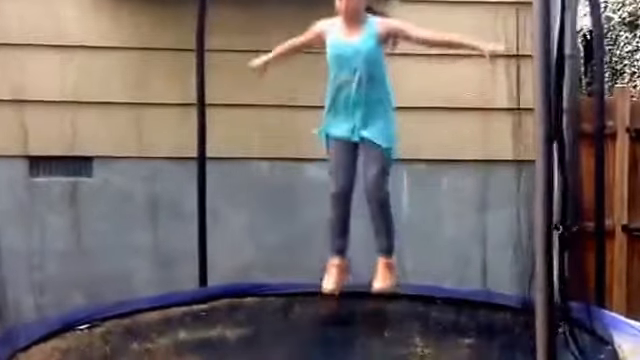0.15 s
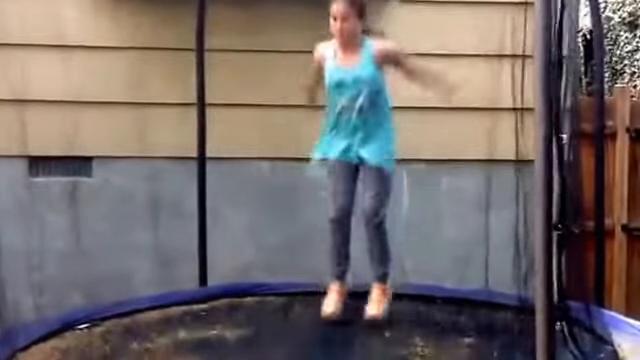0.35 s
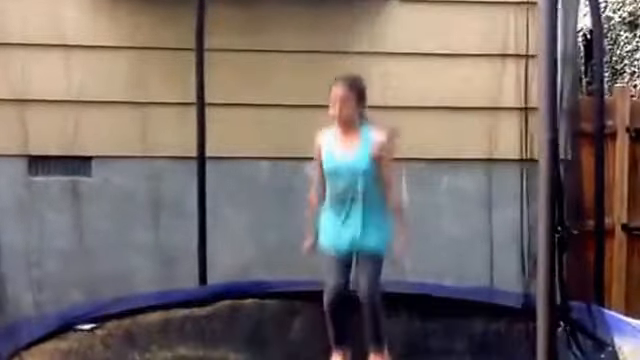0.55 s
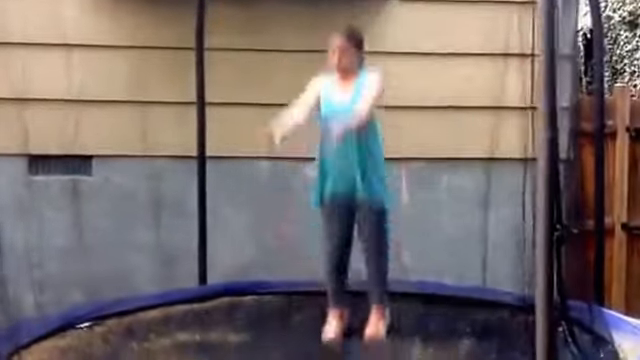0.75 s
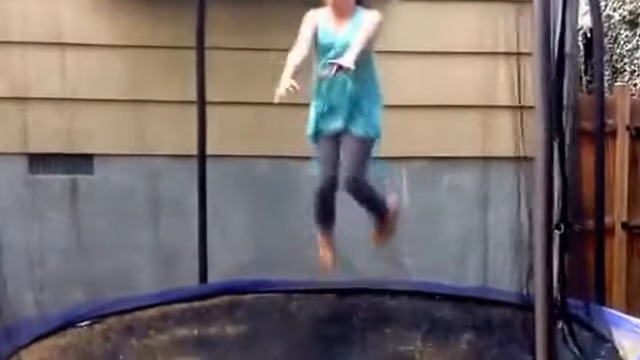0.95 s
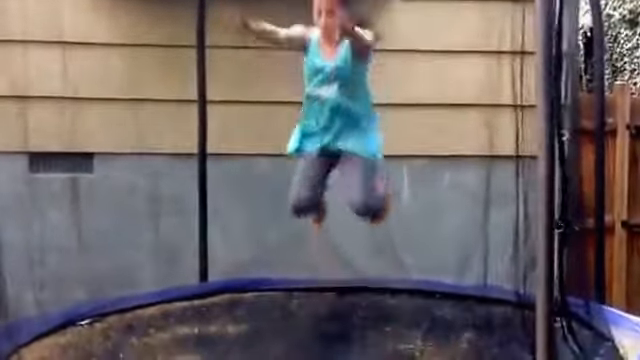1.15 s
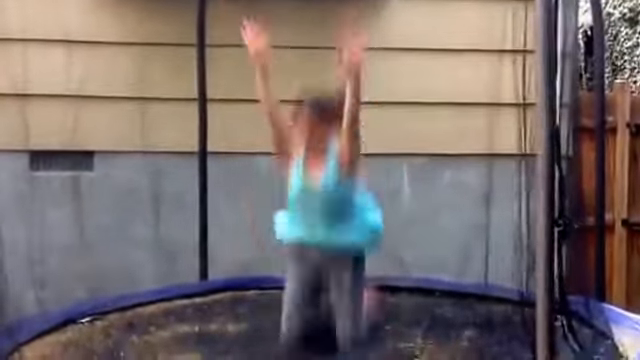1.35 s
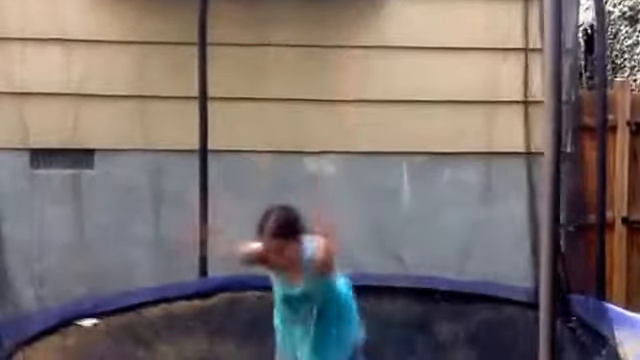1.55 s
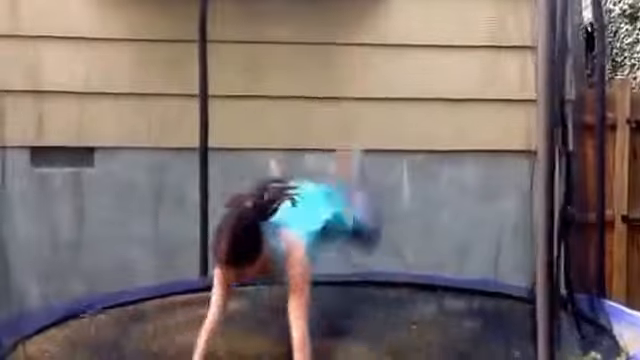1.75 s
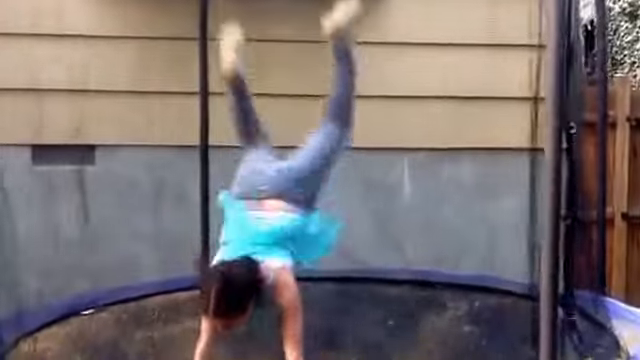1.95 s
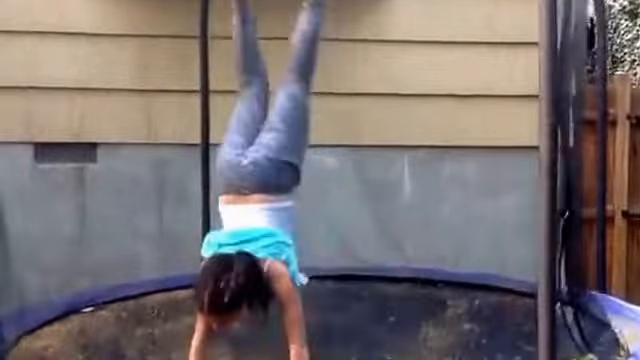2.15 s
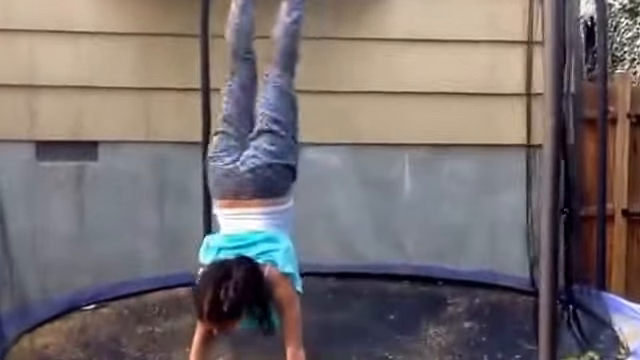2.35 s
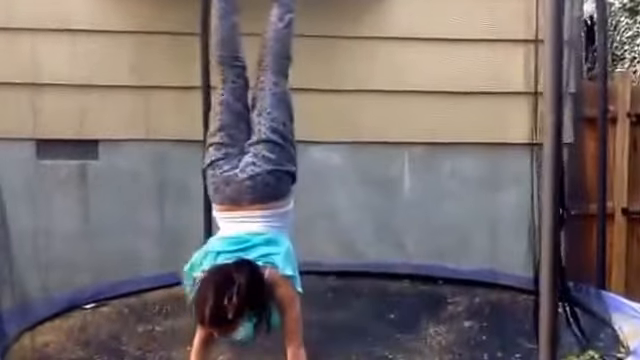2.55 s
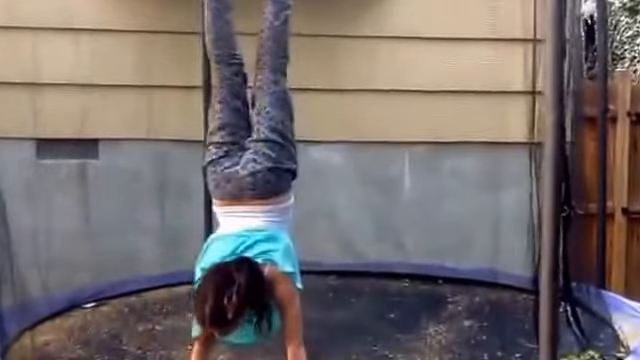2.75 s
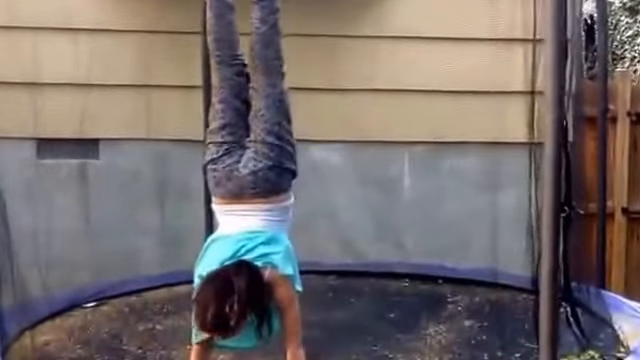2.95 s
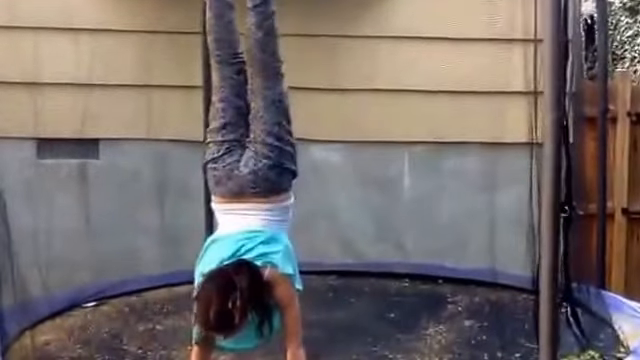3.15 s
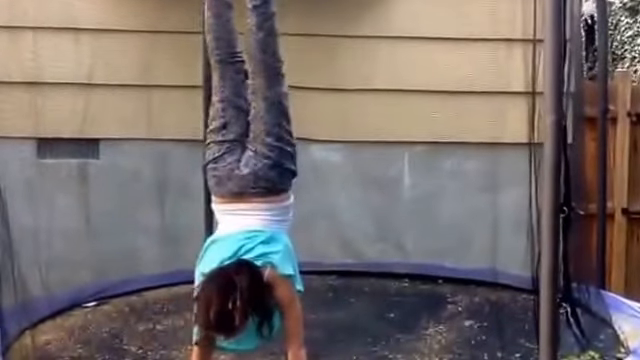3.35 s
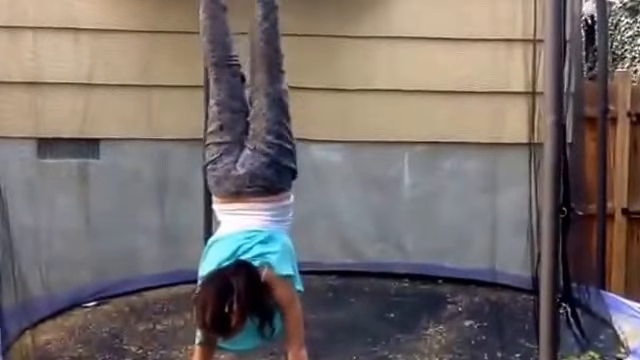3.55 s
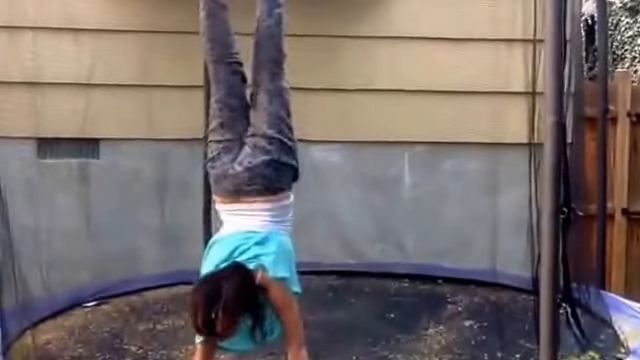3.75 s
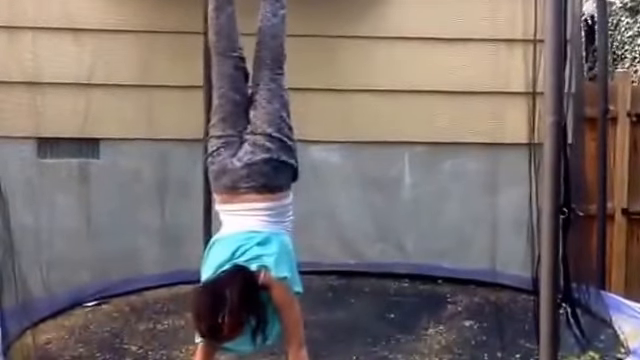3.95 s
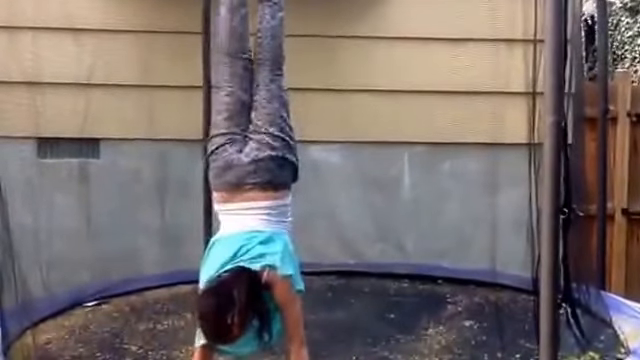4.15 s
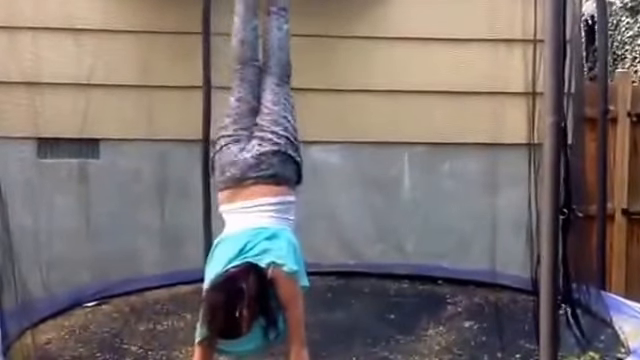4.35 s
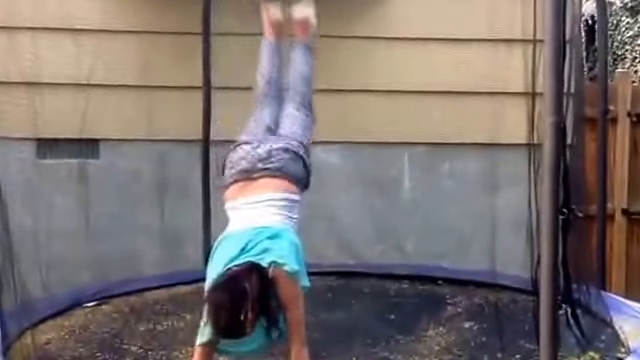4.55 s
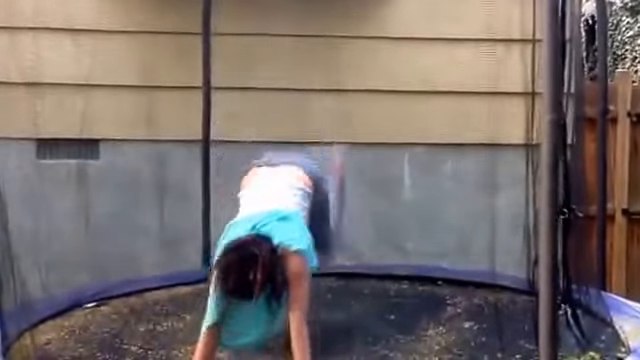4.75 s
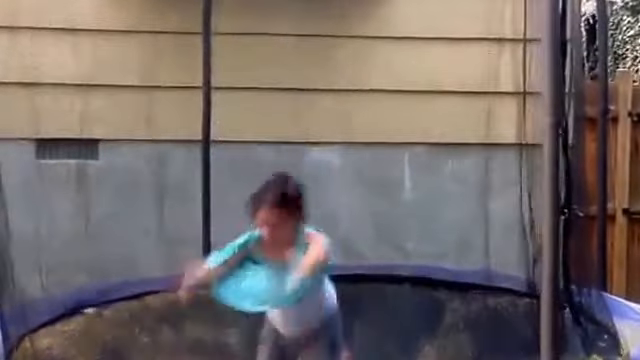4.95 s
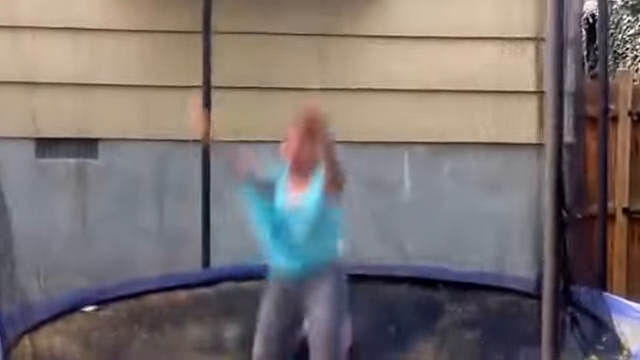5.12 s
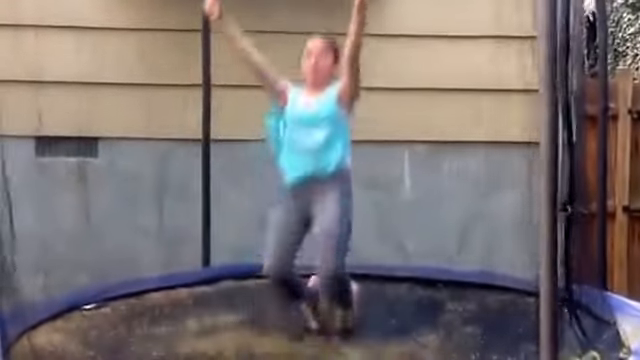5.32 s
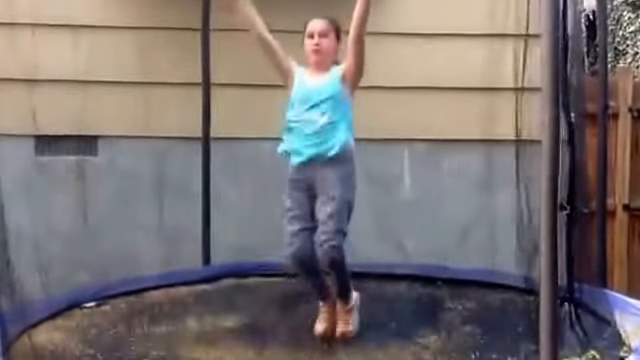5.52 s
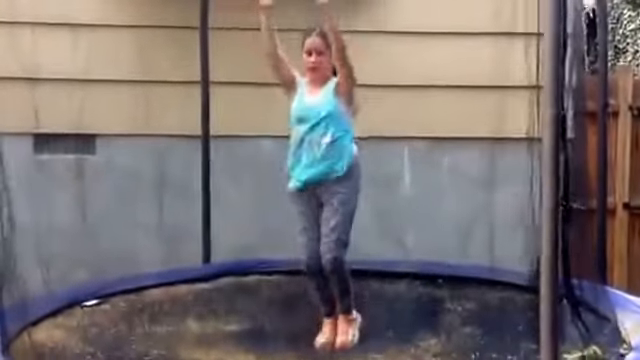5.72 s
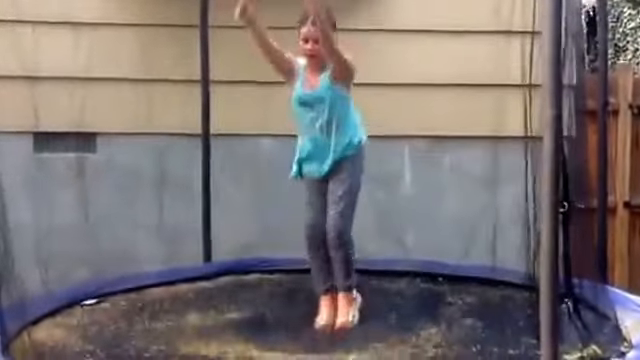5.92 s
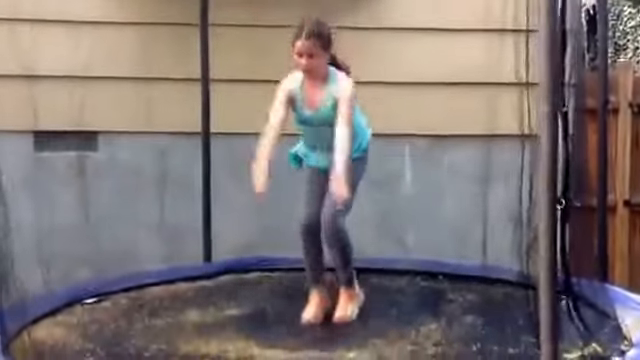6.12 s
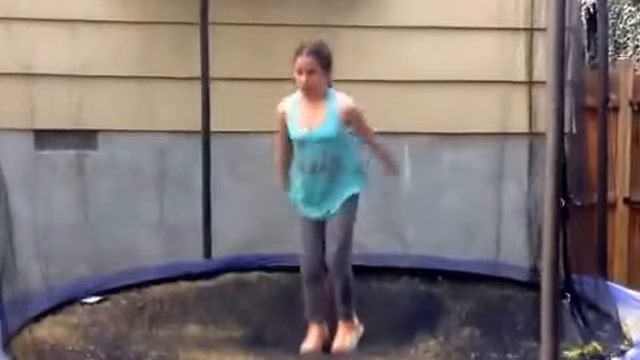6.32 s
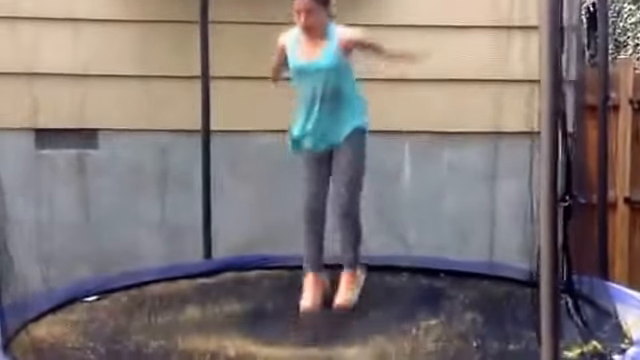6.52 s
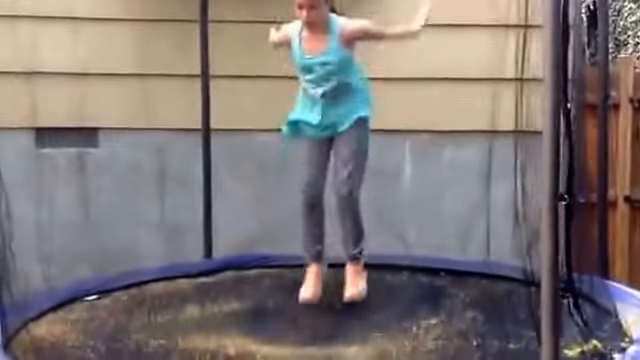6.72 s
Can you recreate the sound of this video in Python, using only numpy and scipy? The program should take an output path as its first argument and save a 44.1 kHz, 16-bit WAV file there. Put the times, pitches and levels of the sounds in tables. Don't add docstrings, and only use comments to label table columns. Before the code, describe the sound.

A small, thin-bassed microphone hears a backyard trampoline. Two light slaps lead to one bright, dominant smack with a low thud, metallic ping and rush of air. Brief spring squeaks fade into near stillness, where sliding whistles and hoarse, echoing chirps stand out. A quick squeaky chatter leads to a softer, duller body landing, then cloth brushes, one light slap and scattered ticks over distant traffic.

```python
import sys
import numpy as np
from scipy import signal
from scipy.fft import rfft, irfft, next_fast_len
from scipy.io import wavfile
from scipy.ndimage import map_coordinates

SR = 44100
rng = np.random.default_rng(int(sys.argv[2]) if len(sys.argv) > 2 else 0)


def wav_record(signal):
    frames = np.transpose(np.atleast_2d(signal))
    bounded = np.clip(frames, -1, 1)
    quanta = np.round(bounded * 32767).astype(np.int16)
    wavfile.write(sys.argv[1], SR, quanta)


def how_loud(loudness_db):
    steps = np.asarray(loudness_db, float) / 20
    return 10 ** steps


N = 298998

# start in seconds, level in dB, clap of cloth in dB, rise in seconds,
# time to die by 60 dB in seconds.
THUDS = [
    (.6, -54, 3, 0.0064, 0.12),
    (1.5, -34.5, -0.5, 0.014, 0.088),
    (1.783, -50, -17, 0.0083, 0.12),
    (4.985, -47.5, -2, 0.022, 0.19),
    (5.018, -35, 2.5, 0.0074, 0.058),
    (5.307, -66, 14, 0.0029, 0.033),
    (5.324, -62.5, 14, 0.0035, 0.12),
]
# start in seconds, peak in dB, pitch in Hz, time to die by 60 dB in seconds.
PUSHES = [
    (1.4141, -30.5, 251, 0.019),
    (1.4277, -31, 235, 0.022),
    (4.9221, -28, 226, 0.024),
]
# pitch in Hz, width in Hz, level in dB.
DRUM = [(160, 86, -4), (254, 69, 4), (408, 110, 2)]
CLOTH = [(1130, 460, 4), (1640, 800, 2), (2480, 890, -4)]

# start in seconds, peak in dB, dull part in dB, bright part in dB,
# time to die by 60 dB in seconds.
SLAPS = [(0.5256, -34.5, -14, 2.5, 0.022), (0.6179, -31, -2, 1, 0.073), (1.482, -23, -4, -5, 0.068),
         (1.494, -15.5, -12, 3.5, 0.058), (1.8096, -33, -11, -0.5, 0.071), (2.3235, -54, -3, 9.5, 0.18),
         (4.6897, -43, 5, 3, 0.11), (4.8308, -43.5, 9, -6, 0.089), (5.0015, -43, 6, 3, 0.08),
         (5.025, -36, 0, -4, 0.08), (5.6462, -50, 7, 10, 0.082), (6.0155, -35.5, -0.5, -1, 0.095)]
# pitch in Hz, width in Hz, level in dB.
FRAME = [(3080, 1400, 0.5), (5550, 1970, 0), (7480, 1730, 0), (8250, 550, 3.5), (10070, 2400, -4),
         (12800, 3700, -13.5)]
# start in seconds, peak in dB.
KNOCKS = [(.0113, -47), (.9944, -52), (1.4361, -52), (1.9305, -47), (2.156, -52), (2.2664, -47.5),
          (2.8263, -52), (2.88, -52), (5.75, -50.5), (6.0576, -51.5), (6.2998, -46.5)]
SNAPS = [(.0812, -54.5), (.4407, -53), (.474, -51), (.8868, -57), (1.4245, -48), (1.8438, -63),
         (2.9304, -54.5), (4.9225, -47), (5.5544, -54), (5.983, -54), (6.1497, -56), (6.7245, -52),
         (.3774, -63)]
TICKS = [
    (1.515, -30.5),
    (5.1574, -45),
    (6.0794, -48),
    (6.3847, -42),
    (6.4443, -46),
    (6.4658, -44),
    (6.4794, -42),
    (6.494, -53),
    (6.7494, -54),
]
# dull part in dB, bright part in dB,
# time to die by 60 dB in seconds.
KNOCK = (10.2, -1.5, .09)
SNAP = (6, 6.7, 0.037)
TICK = (-21, -1, 0.071)
HARD_DB = -40
BLOW = 5.6

# peak in seconds, rise in seconds, fall in seconds, level in dB,
# dull share in dB. Rise and fall each span 20 dB.
SWELLS = [(0.0, .1, .2, -59, -1.5), (.68, 0.37, 0.42, -55, 2), (1.47, 0.063, 0.45, -55.5, 3),
          (1.97, 0.38, 0.31, -54, -2.5), (2.3, 0.13, 0.62, -67.5, 5), (4.62, 0.37, 1, -77.5, 13),
          (4.94, .03, 0.22, -59.5, -14), (5.09, 0.2, 0.16, -54.5, -4), (5.3, 0.86, 0.19, -63, 9.5),
          (5.63, 0.49, 0.23, -62.5, -16), (5.82, 0.38, 0.68, -66.5, 8), (6.11, 0.18, 0.049, -66, 1),
          (6.38, 0.27, 0.28, -55, -5.5), (6.76, 0.41, 0.14, -71, 13)]
# start in seconds, rise in seconds, length in seconds,
# first level in dB, last level in dB.
GUSHES = [
    (1.495, .02, .175, -42, -47),
    (4.985, .018, .2, -44, -54),
]
# pitch in Hz, level in dB per Hz.
WEAVE = [(290, -13), (500, -8.5), (788, -1), (847, -1.5), (1280, -5), (1720, -1), (5010, -6), (8020, -4.5),
         (15000, -5.5)]
SWELL_ROUND, GUSH_DULL_DB = 1.66, -3.5

# start in seconds, length in seconds, slip rate in Hz, level in dB,
# number of strong overtones.
SQUEAKS = [
    (1.852, 0.024, 1100, -52, 1.2),
    (1.93, 0.022, 1115, -53, 3.6),
    (1.974, 0.016, 1152, -53, 2),
    (2.321, 0.07, 980, -62, 5.6),
    (2.72, .05, 499, -61, 3),
    (4.251, .03, 1650, -68, 1),
    (4.437, 0.14, 1160, -65, 2),
    (5.24, .03, 1290, -53, 2),
]
# length in seconds, slip rate in Hz, level in dB, number of strong overtones.
TRILL = (0.06, 1477, -55.5, 0.7)
TRILL_S, TRILL_GAP_S, TRILL_TIMES = 4.529, .0398, 5
SQUEAK_ARCH, TRILL_ARCH = .015, .13
SQUEAK_TILT_DB, SQUEAK_SAG_DB, SQUEAK_ROUGH = -1, 9, .45
# start in seconds, level in dB, pitch in Hz, second pitch in Hz,
# time to die by 60 dB in seconds.
PINGS = [
    (1.4822, -36, 3650, 5500, .04),
    (1.4948, -29, 7000, 4600, .02),
    (1.497, -24, 7800, 3900, .045),
    (.13, -64, 8570, 11300, 0.52),
    (0.936, -58.5, 8470, 11300, 0.54),
    (1.318, -68, 10900, 7040, 0.27),
    (2.25, -70, 7200, 6700, .15),
    (2.83, -72, 10900, 6700, .4),
    (4.45, -67, 7000, 7500, .5),
    (6.58, -61, 11300, 8450, 0.27),
]

# start in seconds, length in seconds, start pitch in Hz, held pitch in Hz, level in dB.
WHISTLES = [(.46, .1, 2440, 2295, -58), (2.22, .1, 3370, 3175, -67), (2.33, .15, 3010, 2735, -66),
            (3.0, .08, 2350, 2200, -69), (3.29, .15, 3440, 2865, -64), (3.375, .14, 2540, 2035, -65),
            (3.855, .25, 2400, 2840, -60), (3.97, .05, 3300, 3700, -73), (4.03, .07, 3750, 3450, -73),
            (4.2, .1, 3500, 3300, -74), (4.315, .05, 1930, 2110, -60), (4.57, .11, 2780, 2320, -58),
            (5.9, .075, 3070, 2845, -64), (6.49, .1, 2450, 2075, -64), (6.62, .11, 2820, 2675, -62)]
# start in seconds, length in seconds, pitch in Hz, level in dB.
NOTES = [(.195, .055, 2000, -62), (.4, .03, 2785, -69), (.43, .04, 2635, -64), (.885, .06, 2915, -64),
         (.905, .1, 2305, -58), (1.012, .055, 1995, -58), (2.76, .12, 2235, -67), (2.78, .06, 2075, -62),
         (2.89, .08, 2655, -67), (2.95, .06, 1995, -65), (6.06, .08, 3150, -66), (4.435, .04, 2315, -62),
         (4.44, .09, 2855, -60), (5.07, .1, 2845, -63), (6.07, .08, 2025, -66)]
SCOOP, FALL_S, RISE_S = 1.015, .015, .01
# start in seconds, level in dB.
CHIRPS = [
    (0.278, -64),
    (1.199, -67.5),
    (2.505, -63.5),
    (3.324, -63.5),
    (4.371, -65),
    (5.335, -66),
    (6.568, -66.5),
]
# time in seconds, pitch in Hz, level in dB.
CHIRP = [
    (0, 3900, -9),
    (.02, 4750, -2),
    (.028, 4300, 0),
    (.047, 3150, 3),
    (.055, 2850, -14),
    (.06, 2700, -10),
    (.088, 2860, -7),
    (.106, 2430, -4),
    (.112, 2350, -20),
]

# pitch in Hz, time to die by 60 dB in seconds.
GARDENS = [(1500, 1), (3000, 0.7), (6000, 0.42)]
YARD = [(200, 0.11), (2000, 0.32), (10000, 0.26)]

# time in seconds, engine hum in dB.
TOWN = [(0.0, -62), (0.58, -58), (1.23, -60), (1.64, -59), (1.89, -60), (3.32, -63), (3.61, -60),
        (4.95, -60), (5.36, -63), (5.93, -63), (6.12, -61), (6.78, -63)]
# pitch in Hz, level in dB per Hz.
DRONE = [(15, -79), (25, -25.5), (183, 1.5), (297, -8), (445, -12), (684, -16), (871, -15), (2170, -30.5),
         (2490, -29.5), (2700, -27.5), (3090, -32), (11500, -34.5), (15500, -35.5)]
ROAR_DB, ROAR_FOLLOWS, HUM_DB = -61, .3, 0.5


def unit(x):
    return x / np.sqrt(np.mean(x ** 2) + 1e-20)


def along(points, hz):
    f, v = np.transpose(points)
    return np.interp(np.log(hz + 1), np.log(f + 1), v)


def wobble(rate, size):
    knots = rng.standard_normal(int(size * rate / SR) + 4)
    return map_coordinates(knots, [np.arange(size) * rate / SR])


def filtered(x, response):
    m = next_fast_len(len(x) + SR // 4)
    return irfft(rfft(x, m) * response(np.fft.rfftfreq(m, 1 / SR)), m)[:len(x)]


def low_part(x, hz):
    return filtered(x, lambda f: 1 / (1 + (f / hz) ** 4))


def resonant(modes):
    def response(f):
        total = 0
        for k, (center, width, db) in enumerate(modes):
            ring = 1j * f * width / (center * center - f * f + 1j * f * width)
            total = total + (-1) ** k * how_loud(db) * ring
        return total
    return response


def add(track, s, sound):
    part = track[max(round(s * SR), 0):][:len(sound)]
    part += sound[:len(part)]


def tone(hz):
    return np.sin(2 * np.pi * (np.cumsum(hz) / SR + rng.random()))


def fade(size):
    return np.abs(np.sin(np.linspace(0, np.pi, size))) ** 0.16


def echoed(x, decays, wet_db):
    hz, t, z = signal.stft(rng.standard_normal(SR * 5 // 8), SR, nperseg=256)
    dying = how_loud(-60 * t / along(decays, hz)[:, None])
    tail = signal.istft(z * dying, SR, nperseg=256)[1]
    late = np.pad(x, (400, 0))
    wet = signal.fftconvolve(late, tail / np.linalg.norm(tail))
    return np.pad(x, (0, len(wet) - len(x))) + how_loud(wet_db) * wet


def thuds():
    out, t = np.zeros(N), np.arange(SR // 4) / SR
    for s, db, cloth_db, rise, t60 in THUDS:
        press = np.minimum(t / rise, 1) ** 2 * how_loud(-60 * np.maximum(t - rise, 0) / t60)
        boom = unit(filtered(rng.standard_normal(len(t)), resonant(DRUM)))
        clap = unit(filtered(rng.standard_normal(len(t)), resonant(CLOTH)))
        add(out, s, how_loud(db) * press * (boom + how_loud(cloth_db) * clap))
    for s, db, hz, t60 in PUSHES:
        onset = 1 - np.exp(-t / 0.00078)
        add(out, s, how_loud(db - 60 * t / t60) * onset * np.sin(2 * np.pi * hz * t))
    return out


def slaps():
    out, t = np.zeros(N), np.arange(SR // 5) / SR
    contacts = list(SLAPS)
    for rows, kind in ((KNOCKS, KNOCK), (SNAPS, SNAP), (TICKS, TICK)):
        contacts += [(*row, *kind) for row in rows]
    for s, db, dull_db, bright_db, t60 in contacts:
        decay = how_loud(-60 * t / t60) + 2.8 * how_loud(-60 * t / 0.0017)
        crack = rng.standard_normal(len(t)) * decay * np.minimum(t / 0.00009, 1)
        crack[round(.0004 * SR)] += BLOW
        bright_modes = FRAME[2:5] if db > HARD_DB else FRAME[2:]
        slap = np.zeros(len(t))
        for modes, part_db in ((CLOTH, dull_db - 9), (FRAME[:2], 0), (bright_modes, bright_db)):
            part = filtered(crack, resonant(modes))
            slap += how_loud(db + part_db) * part / np.abs(part).max()
        add(out, s, slap)
    return out


def mat():
    s, level, dull_level = np.arange(N) / SR, np.zeros(N), np.zeros(N)
    for peak, rise, fall, db, dull_db in SWELLS:
        away = np.where(s < peak, (peak - s) / rise, (s - peak) / fall)
        swell = how_loud(db - 20 * away ** SWELL_ROUND)
        level += swell
        dull_level += how_loud(dull_db) * swell
    for start, rise, length, first_db, last_db in GUSHES:
        times = [0, rise, length, length + .1]
        levels_db = [first_db - 18, first_db, last_db, last_db - 20]
        gush = how_loud(np.interp(s - start, times, levels_db, -120, -120))
        level += gush
        dull_level += how_loud(GUSH_DULL_DB) * gush
    hits = rng.random(N) < 1500 / SR
    grit = hits * rng.normal(size=N) * how_loud(3 * rng.normal(size=N))
    source = how_loud(1.1 * wobble(60, N)) * (rng.standard_normal(N) + .4 * unit(grit))
    rush = unit(filtered(source, lambda hz: how_loud(along(WEAVE, hz))))
    dull = low_part(rush, 3000)
    return level * (rush - dull) + dull_level * dull


def squeak(length, hz, db, strong, arch):
    size = round(length * SR)
    stroke = np.linspace(-1, 1, size)
    rate = hz * (1 + .014 * wobble(250, size) - arch * stroke ** 2)
    turn = 2 * np.pi * np.cumsum(rate) / SR
    stack = np.zeros(size)
    for k in range(1, 10):
        overtone_db = SQUEAK_TILT_DB * np.log2(k) - 15 * max(k - strong, 0) + rng.normal(0, 3)
        stack += how_loud(overtone_db + 3.4 * wobble(97, size)) * np.sin(k * turn)
    stack *= 1 + SQUEAK_ROUGH * wobble(900, size)
    return echoed(how_loud(db - SQUEAK_SAG_DB * stroke / 2) * fade(size) * stack, YARD, wet_db=-7)


def springs():
    out = np.zeros(N)
    for s, *rub in SQUEAKS:
        add(out, s, squeak(*rub, SQUEAK_ARCH))
    for k in range(TRILL_TIMES):
        add(out, TRILL_S + k * TRILL_GAP_S, squeak(*TRILL, TRILL_ARCH))
    t = np.arange(SR // 3) / SR
    for s, db, hz, second_hz, t60 in PINGS:
        ring = np.sin(2 * np.pi * hz * t) + .4 * np.sin(2 * np.pi * second_hz * t)
        add(out, s, how_loud(db - 60 * t / t60 + 5.7 * wobble(88, len(t)) - 3.5) * ring)
    return out


def whistling_bird():
    out = np.zeros(N)
    level_notes = [(s, length, SCOOP * hz, hz, db) for s, length, hz, db in NOTES]
    for s, length, start_hz, hz, db in [*WHISTLES, *level_notes]:
        slide = FALL_S if start_hz > hz else RISE_S
        t = np.arange(round(length * SR)) / SR
        pitch = hz + (start_hz - hz) * np.exp(-t / slide)
        pitch += 35 * wobble(160, len(t)) - 80 * (t / length) ** 2
        breath = np.minimum(1, np.minimum(t / .008, (length - t) / .02))
        note = how_loud(db - 1.5 + 2.5 * wobble(90, len(t))) * breath * tone(pitch)
        add(out, s, echoed(note, GARDENS, wet_db=-4))
    return out


def scolding_bird():
    out = np.zeros(N)
    when, hz, level_db = np.transpose(CHIRP)
    t = np.arange(round(when[-1] * SR)) / SR
    for s, db in CHIRPS:
        hoarse = .045 * (t < .055) + .02
        pitch = np.interp(t, when, hz) * (1 + hoarse * wobble(1500, len(t)))
        pitch *= 1 + rng.normal(0, .012)
        note = how_loud(db + np.interp(t, when, level_db) + 2.5 * wobble(144, len(t))) * tone(pitch)
        add(out, s, echoed(note, GARDENS, wet_db=8))
    return out


def traffic():
    hum_db = np.interp(np.arange(N) / SR, *np.transpose(TOWN))
    noise = unit(filtered(rng.standard_normal(N), lambda hz: how_loud(along(DRONE, hz))))
    rumble = low_part(noise, 1500)
    hum = low_part(rumble, 280)
    swell = wobble(6, N)
    engines = how_loud(hum_db + HUM_DB + 0.47 * swell) * unit(hum)
    roar_db = ROAR_DB + ROAR_FOLLOWS * (hum_db - hum_db.mean())
    tyres = how_loud(roar_db + 0.93 * swell) * unit(rumble - hum)
    hiss = how_loud(-56) * (noise - rumble)
    return engines + tyres + hiss


def scene():
    blows = echoed(thuds() + slaps(), YARD, wet_db=-8.0)[:N]
    birds = whistling_bird() + scolding_bird()
    return (blows + mat() + springs() + birds + traffic())[None]


def roll_off(x):
    return signal.sosfilt(signal.butter(12, 15790, fs=SR, output="sos"), x)


def record(dry):
    def microphone(hz):
        bass_loss = (hz / 65) ** 2 / (1 + (hz / 65) ** 2)
        band_limit = 1 / (1 + (hz / 15080) ** 400) + .008 * (hz < 15790)
        return bass_loss * band_limit
    return roll_off(filtered(dry[0], microphone)[None])


dry = scene()
out = record(dry)
wav_record(out)
```